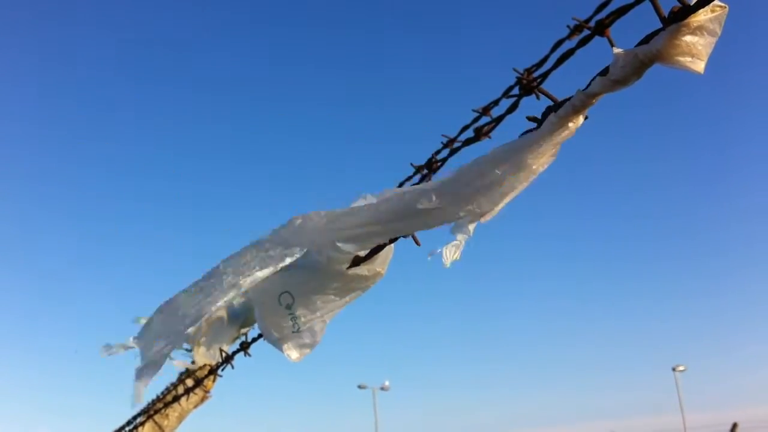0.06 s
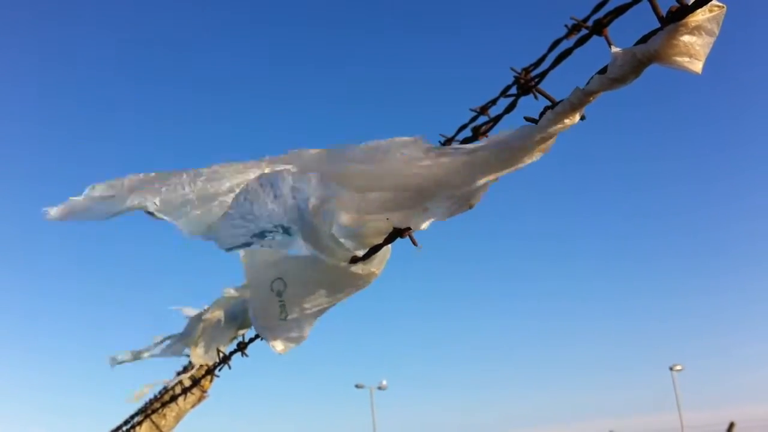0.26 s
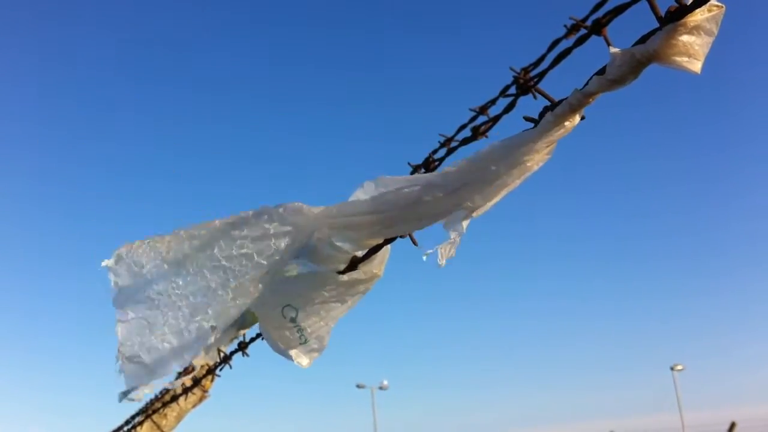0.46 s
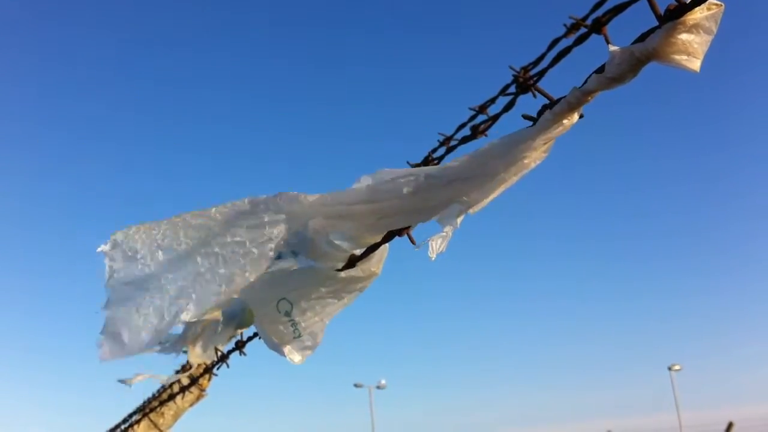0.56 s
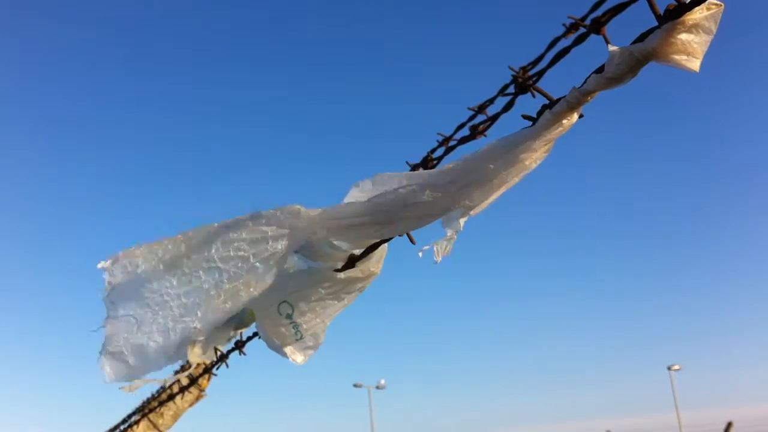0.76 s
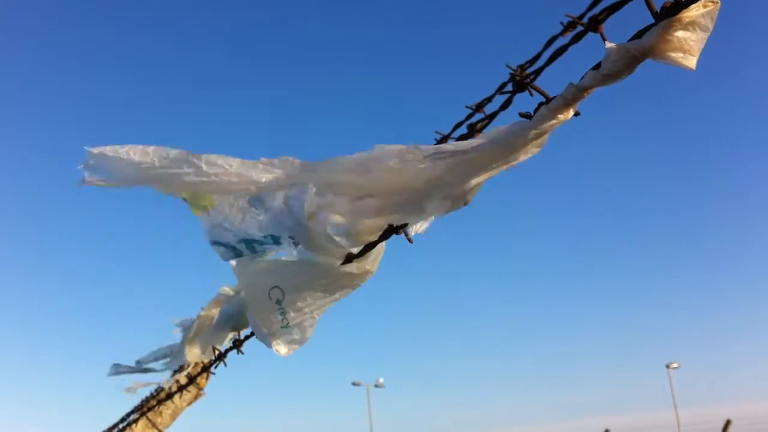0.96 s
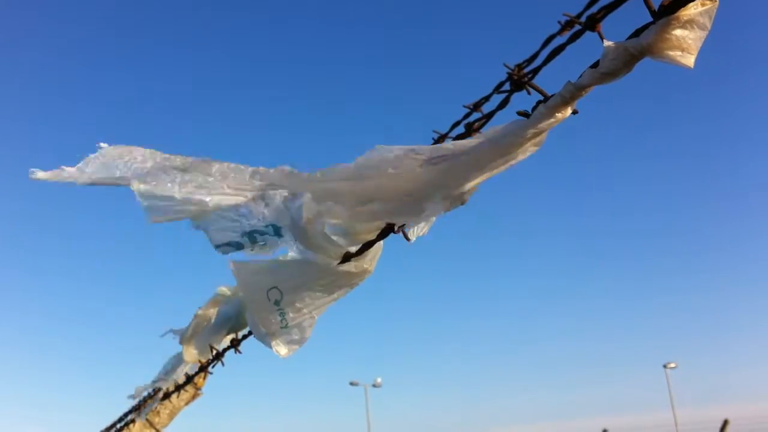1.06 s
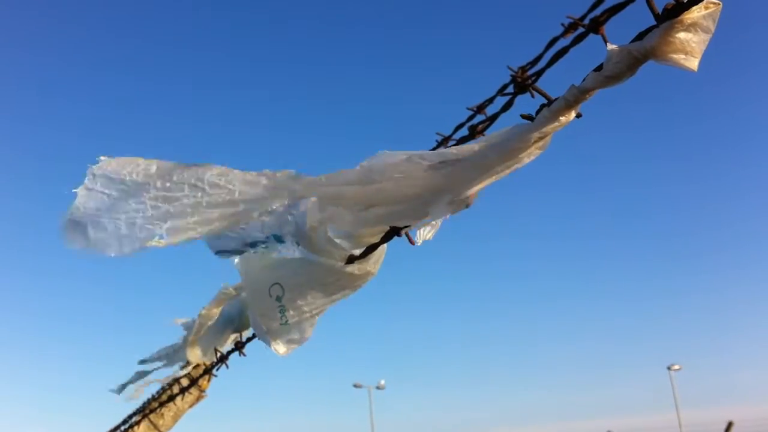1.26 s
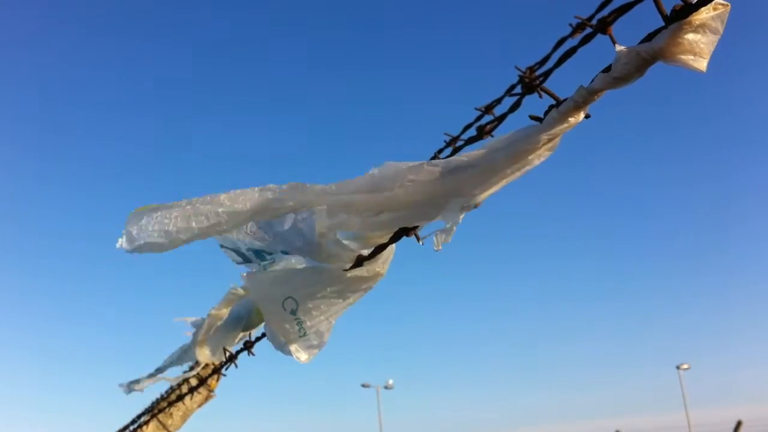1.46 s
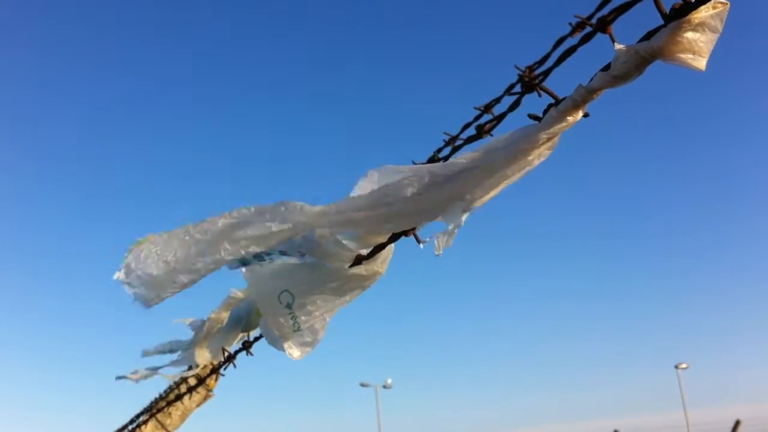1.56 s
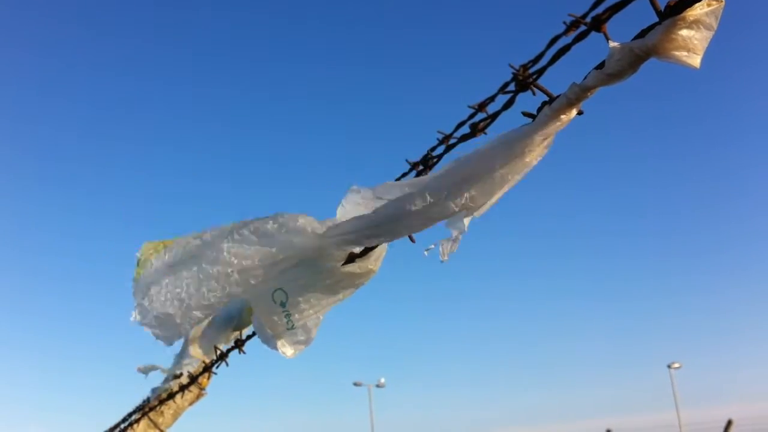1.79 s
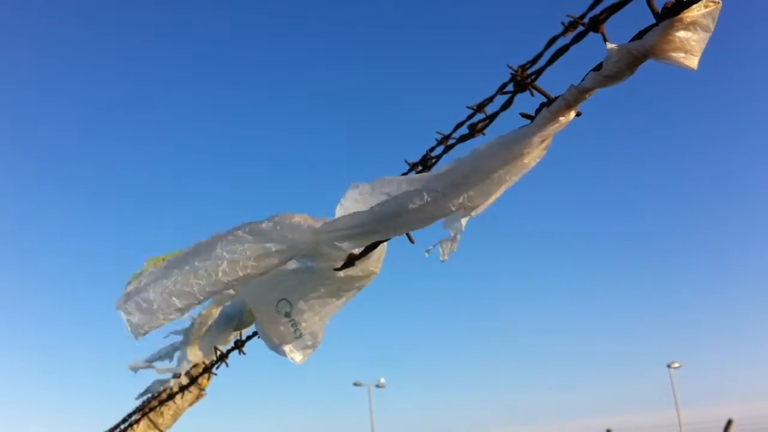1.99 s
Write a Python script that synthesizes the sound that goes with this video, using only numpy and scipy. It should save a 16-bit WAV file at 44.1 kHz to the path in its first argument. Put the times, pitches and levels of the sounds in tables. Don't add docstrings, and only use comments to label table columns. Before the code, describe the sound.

Wind buffets a small microphone with low thumps, easing briefly before hard gusts pop and crack.

```python
import sys
import numpy as np
from scipy import signal
from scipy.fft import next_fast_len
from scipy.io import wavfile

SR = 44100
rng = np.random.default_rng(int(sys.argv[2]) if len(sys.argv) > 2 else 0)


def wrap_up_sound(samples):
    columns = np.atleast_2d(samples).T
    tamed = np.clip(columns, -1, 1)
    steps = np.round(tamed * 32767).astype(np.int16)
    wavfile.write(sys.argv[1], SR, steps)


def attenuation_scalar(level_db):
    decades = np.asarray(level_db, float) / 20
    return 10 ** decades


N = 89655
PORT_CUT_HZ, PORT_TOP_HZ = 96, 1570
THUMP_WIDTH, THUMP_WANDER = 0.39, 0.23
POP_WIDTH, POP_WANDER, POP_SCATTER = 0.28, 0.12, 0.1


def rms_one(x):
    return x / np.sqrt(np.mean(x ** 2) + 1e-20)


def drift(rate_hz):
    pole = np.exp(-40 * np.pi * rate_hz / SR)
    steps = rng.standard_normal(N // 20 + 4002)
    slow = signal.lfilter([1], [1, -2 * pole, pole * pole], steps)[4000:]
    return np.interp(np.arange(N) / 20, np.arange(len(slow)), rms_one(slow - slow.mean()))


def run_in(sos, x):
    lead_in = x[..., 2000:0:-1]
    return signal.sosfilt(sos, np.concatenate([lead_in, x], axis=-1))[..., 2000:]


def butter(x, hz, kind, order):
    return run_in(signal.butter(order, hz, kind, fs=SR, output="sos"), x)


def bell(s, width_s):
    return np.exp(-.5 * ((np.arange(N) / SR - s) / width_s) ** 2)


def buffeting():
    wind = thumps() + pops() + turbulence()
    wind = butter(wind, PORT_CUT_HZ, "high", order=2)
    wind = butter(wind, PORT_TOP_HZ, "low", order=4)
    return wind + cracks() + butter(more_thumps(), PORT_CUT_HZ, "high", order=2)


def turbulence():
    # t/s, level/dB
    gust_curve = [(0, -41), (.14, -42), (.39, -41.5), (.42, -44), (.58, -44.5), (.63, -49.5), (.75, -46),
                  (.97, -54), (1.3, -53), (1.5, -43.5), (1.64, -32), (1.707, -24.5), (1.766, -32.5),
                  (1.797, -49), (1.871, -41), (1.9, -41.5), (1.956, -25.5), (2.012, -44)]
    # f/Hz, level/dB re gust, extra rise/dB per dB of gust
    swirl_sizes = [
        (120.5, -9, -0.04),
        (180, 0.5, 0.1717),
        (339, -7.5, 0.3446),
        (520, -25, 0.938),
        (900, -46.5, 1.7625),
    ]
    s, db = np.transpose(gust_curve)
    gust_db = np.interp(np.arange(N) / SR, s, db) + 4 * drift(59.4)
    wind = np.zeros(N)
    for hz, level_db, rise in swirl_sizes:
        band = butter(rng.standard_normal(N), [hz / 1.256, hz * 1.114], "band", order=2)
        band = rms_one(band)
        swell = np.abs(signal.hilbert(band, next_fast_len(N))[:N])
        band = rms_one(band / (swell + .3) ** 0.35)
        band_db = gust_db + level_db + rise * (gust_db + 40) + 2.0 * drift(hz / 8)
        wind += attenuation_scalar(band_db) * band
    return wind


def thumps():
    # t/s, level/dB, f/Hz, length/ms
    thump_events = [(0.027, -25, 165, 12), (0.111, -29, 206, 61), (0.125, -27, 241, 1.85),
                    (0.174, -26.5, 217, 10.5), (0.2, -22, 176, 4.5), (0.341, -25.5, 155.7, 96),
                    (0.382, -28.5, 159.6, 22), (0.445, -20, 220, 9.3), (0.512, -29, 180, 6.3),
                    (0.554, -33.5, 280, 8.3), (0.574, -29.5, 255, 15.4), (0.823, -31, 157.5, 8.7),
                    (0.898, -25.5, 209, 12.6), (1.179, -31, 196, 14.5), (1.339, -28.5, 180, 25),
                    (1.365, -23, 230, 2.5), (1.385, -27.5, 166, 15), (1.405, -22.5, 245, 4.8),
                    (1.527, -20.5, 193, 19), (1.554, -23, 257, 10.6), (1.582, -14.5, 196.5, 6.9),
                    (1.625, -23.5, 243, 21), (1.666, -22, 250, 7.1), (1.694, -14, 249, 4),
                    (1.705, -17, 229, 5.3), (1.733, -8.5, 225, 6.1), (1.754, -25, 229, 5.1),
                    (1.763, -18, 206, 6.6), (1.913, -18, 135, 11.2), (1.934, -23.5, 203, 21),
                    (1.945, -18.5, 213, 10), (1.951, -18, 244, 4.7), (1.967, -15, 269, 4.5),
                    (1.9735, -17.5, 218, 7.1), (1.994, -20, 195, 18)]
    return eddies(thump_events, THUMP_WIDTH, THUMP_WANDER, edge_db=-15.5, scatter=0.94)


def pops():
    # t/s, level/dB, f/Hz, length/ms
    pop_events = [(.0015, -24, 236, 8), (0.229, -31, 383, 8.9), (0.339, -30.5, 470, 4.5),
                  (0.4415, -25.5, 480, 1.9), (0.457, -21, 340, 5.9), (0.911, -31.5, 520, 5.8),
                  (1.175, -40, 455, 23), (1.404, -40.5, 467, 5.4), (1.554, -32, 520, 5.3),
                  (1.595, -33, 500, 2.7), (1.6235, -29, 520, 2.9), (1.66, -28.5, 458, 3.3),
                  (1.6715, -22, 700, 2), (1.684, -17.5, 520, 4), (1.6877, -6, 522, 3.8),
                  (1.701, -22.5, 590, 16.5), (1.7125, -19.5, 493, 7.4), (1.7165, -19, 544, 3.6),
                  (1.724, -16.5, 625, 2.6), (1.736, -17.5, 536, 2.3), (1.75, -24.5, 520, 3.4),
                  (1.778, -23, 577, 4.7), (1.923, -26.5, 480, 2.6), (1.943, -28, 510, 1.05),
                  (1.954, -18.5, 645, 2.05), (1.965, -24, 406, 2.9), (2.004, -20, 450, 4.3),
                  (2.0325, -26.5, 304, 4)]
    return eddies(pop_events, POP_WIDTH, POP_WANDER, edge_db=-22, scatter=POP_SCATTER)


def cracks():
    # t/s, level/dB, f/Hz, length/ms
    crack_events = [(.3435, -53.5, 5570, 3.5), (.441, -39, 900, 1.3), (1.672, -34, 1084, 2.4),
                    (1.688, -35, 966, 4.6), (1.7015, -44, 950, 5.1), (1.717, -29, 985, 2.2),
                    (1.7303, -20.5, 990, 1.15), (1.7365, -24, 880, 2.5), (1.751, -36.5, 805, 2),
                    (1.762, -33.5, 1220, 2), (1.777, -28.5, 900, 1.9), (1.943, -34, 1016, 3.8),
                    (2.003, -36.5, 800, 1.7)]
    return eddies(crack_events, POP_WIDTH, POP_WANDER / 4, edge_db=-29.5, scatter=POP_SCATTER)


def more_thumps():
    # t/s, level/dB, f/Hz, length/ms
    more_thump_events = [(.065, -37.5, 180, 48), (.245, -32.5, 200, 13), (.28, -46, 157, 8),
                         (.407, -33, 260, 3.7), (.468, -27, 260, 7.3), (.595, -31.5, 155, 9.9),
                         (.737, -45, 151, 12.5), (.916, -31.5, 152, 11.4), (1.592, -15.5, 219, 9),
                         (1.7235, -11, 219, 6.6), (1.875, -32.5, 216, 12), (1.972, -15.5, 195, 10),
                         (.363, -29, 180, 17), (1.654, -23.5, 220, 7.6), (1.69, -20.5, 149.4, 60),
                         (1.73, -21, 152.5, 53)]
    return eddies(more_thump_events, THUMP_WIDTH, THUMP_WANDER, edge_db=-12.5, scatter=0.78)


def eddies(rows, width, wander, edge_db, scatter):
    out, t = np.zeros(N), np.arange(N) / SR
    phases = scatter * rng.uniform(-np.pi, np.pi, (len(rows), 2))
    for (s, db, hz, ms), phase in zip(rows, phases):
        width_s = width * ms / 1000
        stray = np.cumsum(drift(hz / 3)) / SR
        turn = 2 * np.pi * hz * (t - s + wander * (stray - stray[int(s * SR)]))
        swing = bell(s, width_s) * np.cos(turn + phase[0])
        edge = bell(s, width_s / 2) * np.cos(1.9 * turn + phase[1])
        out -= attenuation_scalar(db - 0.5) * (swing + attenuation_scalar(edge_db) * edge)
    return out


def bag():
    # t/s, level/dB, f/Hz, length/ms
    tick_events = [(.13, -72.5, 13500, 11), (0.403, -68, 5500, 3.2), (.56, -74, 11170, 4.3),
                   (1.04, -73, 11100, 34), (1.067, -70, 12000, 9), (1.27, -73, 13500, 19),
                   (1.595, -67, 9400, 4.8), (1.597, -65, 7150, 8), (1.597, -66, 12950, 11),
                   (1.82, -71, 12000, 12), (1.928, -69.5, 13500, 13)]
    grain, out = rng.standard_normal(N), np.zeros(N)
    for s, db, hz, ms in tick_events:
        band = butter(grain, [hz * 0.84, hz * 1.16], "band", order=2)
        swell = np.abs(signal.hilbert(band, next_fast_len(N))[:N])
        band = band / (swell + band.std() / 2)
        out += attenuation_scalar(db) * bell(s, ms / 2500) * rms_one(band)
    return out


def bird():
    bird_notes = [(1.416, 0.02, 5700, 5000, -70), (1.423, 0.053, 4960, 4670, -69),
                  (1.46, 0.039, 5000, 4900, -74), (1.514, 0.05, 4500, 4570, -82),
                  (1.55, .03, 4350, 4870, -73), (1.581, 0.018, 4850, 4400, -74),
                  (1.638, 0.035, 4380, 4170, -74), (1.705, 0.049, 5280, 4750, -74),
                  (1.74, 0.077, 4770, 4650, -74.5), (1.824, .03, 4960, 4830, -81.5),
                  (1.84, .025, 4250, 5000, -76)]
    out, t, waver = np.zeros(N), np.arange(N) / SR, drift(140)
    for s, length, from_hz, to_hz, db in bird_notes:
        u = np.clip((t - s) / length, 0, 1)
        pitch_hz = from_hz + (to_hz - from_hz) * u + 140 * waver
        whistle = np.sin(2 * np.pi * np.cumsum(pitch_hz) / SR)
        out += attenuation_scalar(db + 4.0) * np.sin(np.pi * u) * whistle
    return out * attenuation_scalar(3.0 * drift(90))


def roar():
    # f/Hz, level/dB per Hz
    roar_curve = [(60, -18), (300, -4.5), (570, -5.5), (690, -12.5), (1500, -14), (2800, -20),
                  (3300, -27.5), (4200, -32.5)]
    # f/Hz, level/dB per Hz
    hiss_curve = [(4200, -33), (5600, -31.5), (7500, -35.5), (10500, -39), (13500, -44.5), (15800, -30.5)]
    hz, db = np.transpose(roar_curve + hiss_curve[1:])
    out, together = 0, drift(1.5)
    edges = 40 * 2 ** np.arange(0, 9, 1 / 3)
    white = rng.standard_normal((2, N))
    for k, (low, high) in enumerate(zip(edges, edges[1:])):
        level_db = np.interp(np.log(low * high) / 2, np.log(hz), db)
        level_db = level_db + 0.54 * together + 1.03 * drift(12)
        out = out + attenuation_scalar(level_db) * butter(white[k % 2], [low, high], "band", order=2)
    return attenuation_scalar(-53.5) * rms_one(out)


def hum():
    # t/s, level/dB
    hum_curve = [
        (0, -65.5),
        (.5, -57),
        (.75, -46.5),
        (.94, -42.5),
        (1.05, -52),
        (1.15, -41.5),
        (1.3, -52),
        (2.03, -51),
    ]
    centre_hz, half_width_hz = 361.5, 57
    band_hz = [centre_hz - half_width_hz, centre_hz + half_width_hz]
    tone = butter(rng.standard_normal(N), band_hz, "band", order=2)
    return attenuation_scalar(np.interp(np.arange(N) / SR, *np.transpose(hum_curve))) * rms_one(tone)


def scene():
    return (buffeting() + bag() + bird() + roar() + hum())[None]


def roll_off(x):
    return signal.sosfilt(signal.butter(12, 15790, fs=SR, output="sos"), x)


def record(dry):
    mix = butter(dry, 62, "high", order=2)
    mix = run_in(signal.cheby2(16, 60, 16150, fs=SR, output="sos"), mix)
    return roll_off(mix)


dry = scene()
out = record(dry)
wrap_up_sound(out)
```